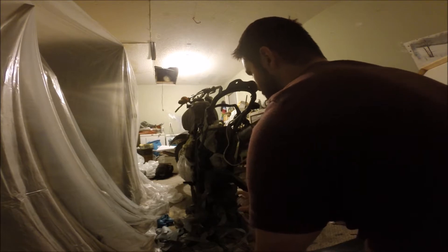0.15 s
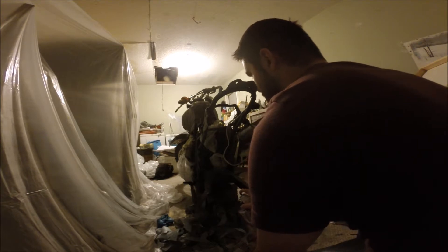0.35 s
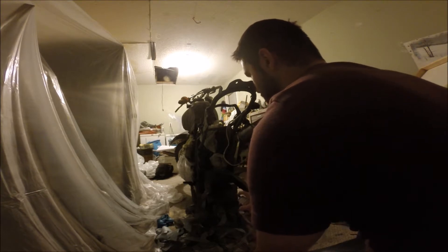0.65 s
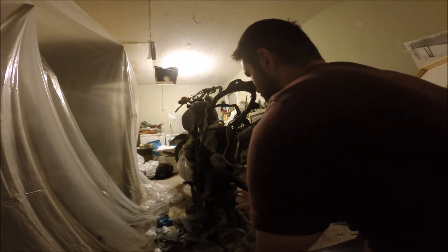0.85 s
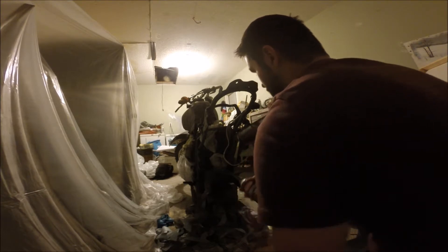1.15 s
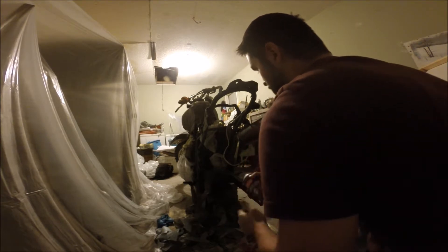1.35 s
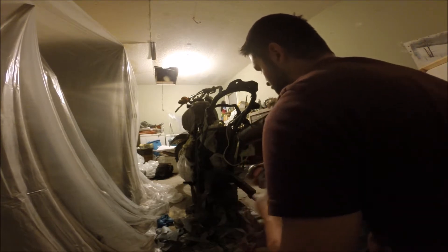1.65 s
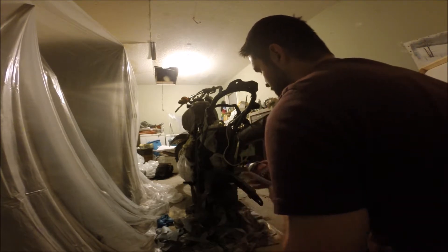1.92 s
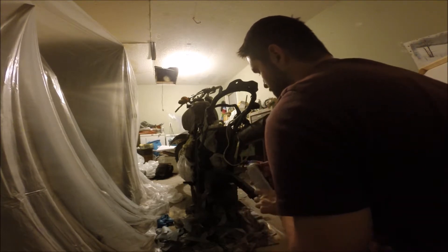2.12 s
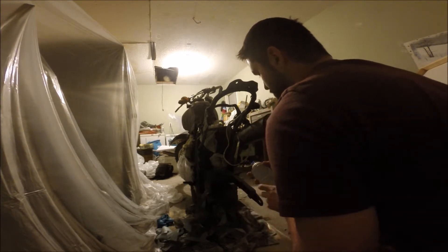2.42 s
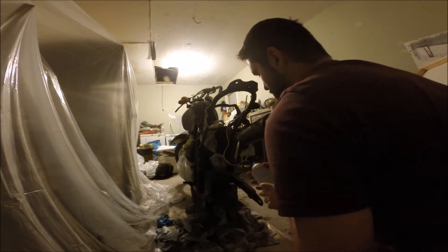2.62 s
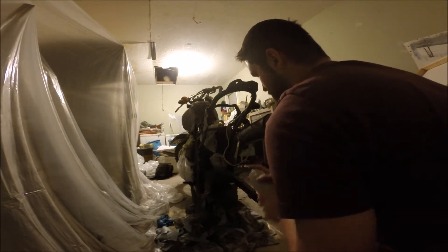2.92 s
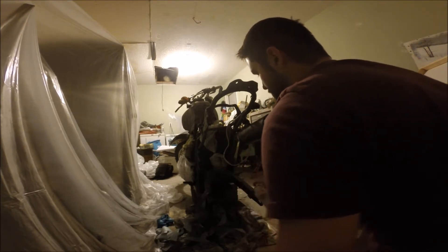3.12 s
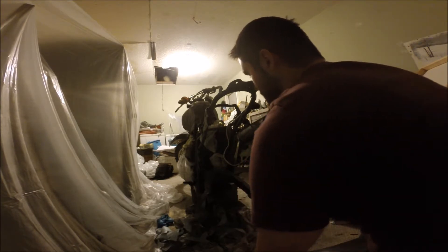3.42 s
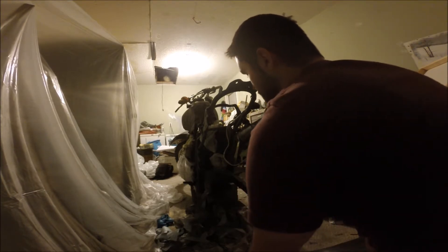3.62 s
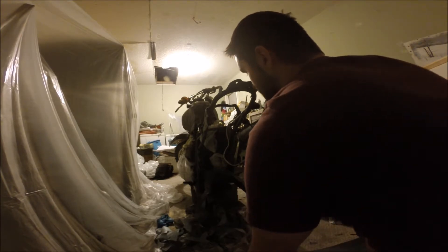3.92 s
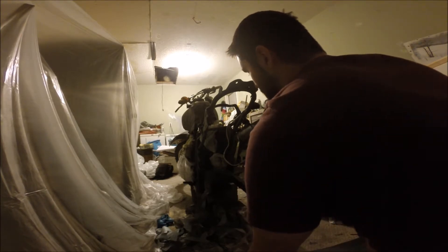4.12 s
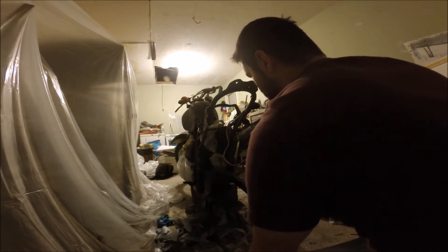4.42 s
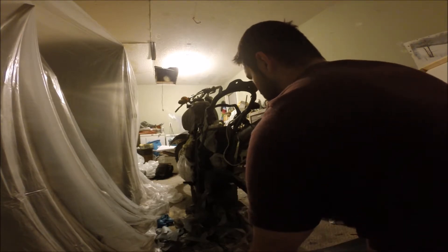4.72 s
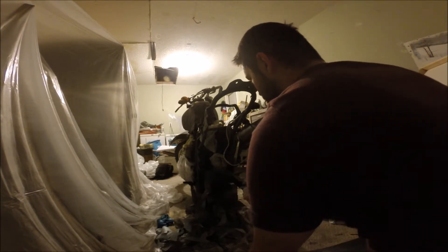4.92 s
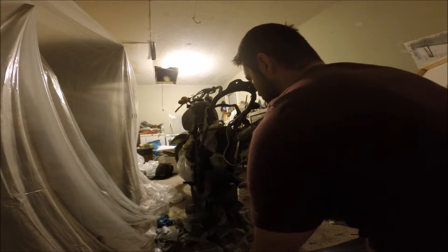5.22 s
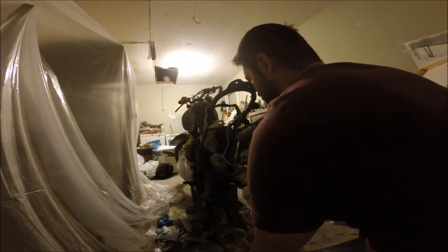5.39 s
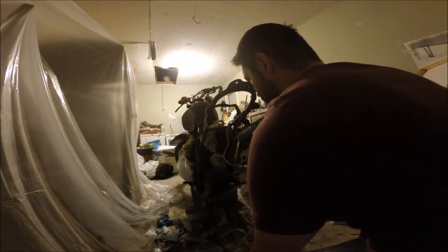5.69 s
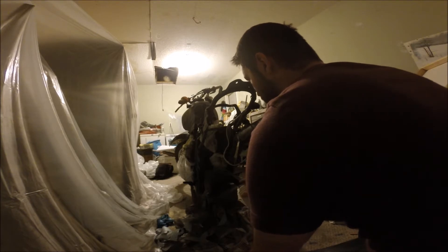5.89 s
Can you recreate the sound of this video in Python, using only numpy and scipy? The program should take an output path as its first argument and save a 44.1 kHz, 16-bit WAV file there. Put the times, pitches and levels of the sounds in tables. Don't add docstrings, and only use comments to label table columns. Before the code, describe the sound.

In a small workshop, an aerosol can is shaken, its steel ball clacking briefly, then rattling densely, before two soft hissing sprays.

```python
import sys
import numpy as np
from scipy import signal
from scipy.fft import rfft, irfft
from scipy.io import wavfile

SR = 44100
rng = np.random.default_rng(int(sys.argv[2]) if len(sys.argv) > 2 else 0)


def nominal_scale(level):
    x = np.asarray(level, float) / 20
    return 10 ** x


def transcribe(u):
    v = np.clip(np.atleast_2d(u).T, -1, 1)
    q = np.round(v * 32767).astype(np.int16)
    wavfile.write(sys.argv[1], SR, q)


N = 266829


def rms_one(x):
    return x / np.sqrt(np.mean(x ** 2) + 1e-20)


def at_hz(points, hz):
    point_hz, level_db = np.array(points)[:, 0], np.array(points)[:, 1]
    return np.interp(np.log(hz), np.log(point_hz), level_db)


def band_pass(x, edges_hz, order=2):
    return signal.sosfilt(signal.butter(order, edges_hz, "band", fs=SR, output="sos"), x)


def gestures(tables, follows=0.89):
    mean_db = -55
    t, gain = np.arange(N) / SR, np.zeros(N)
    for rows in tables:
        s, level_db = np.transpose(rows)
        fade = np.clip(np.minimum(t - s[0], s[-1] + .02 - t) / .02, 0, 1)
        gain += fade * nominal_scale(mean_db + follows * (np.interp(t, s, level_db) - mean_db))
    return gain


def drift(rate):
    r = np.exp(-80 * np.pi * rate / SR)
    slow = signal.lfilter([1], [1, -2 * r, r * r], rng.standard_normal(N // 40 + 2002))[2000:]
    return np.interp(np.arange(N) / 40, np.arange(len(slow)), rms_one(slow))


def ring(clicks, hz, t60):
    r, w = nominal_scale(-60 / (t60 * SR)), 2 * np.pi * hz / SR
    return signal.lfilter([0, np.sin(w)], [1, -2 * r * np.cos(w), r * r], clicks + 1e-18)


def coloured_noise(spectrum):
    hz = np.maximum(np.fft.rfftfreq(N, 1 / SR), 1)
    bins = rfft(rng.standard_normal(N)) * nominal_scale(at_hz(spectrum, hz)) * (hz > 18)
    return rms_one(irfft(bins, N))


# (frequency [Hz], level [dB])
FLOOR_COLOUR = [(12, -30), (20, 1), (122, -3.5), (306, -8.5), (372, -10), (1040, -17.5), (1270, -18),
                (1630, -19.5), (2920, -23), (3260, -24.5), (4070, -25.5), (14300, -43.5), (15500, -39)]


def hiss_and_rumble():
    low_pass = signal.ellip(6, .5, 30, 14900, fs=SR, output="sos")
    return nominal_scale(-54.5) * signal.sosfilt(low_pass, coloured_noise(FLOOR_COLOUR))


# (frequency [Hz], time to fall 60 dB [s])
ROOM_T60 = [(250, 0.35), (1300, 0.23), (3500, 0.19), (9000, 0.21), (15000, 0.19)]
# (frequency [Hz], level [dB])
ROOM_COLOUR = [(250, -5), (1300, 5), (3500, 7.5), (9000, 9), (15000, 12.5)]


def echoes():
    rise_s = 0.00083
    t, out = np.arange(SR // 2) / SR, 0
    edges_hz = 120 * 2 ** np.arange(0, 7.1, .5)
    white = rng.standard_normal((2, len(t)))
    for k, (low_hz, high_hz) in enumerate(zip(edges_hz, edges_hz[1:])):
        band = band_pass(white[k % 2], [low_hz, high_hz])
        hz = np.sqrt(low_hz * high_hz)
        out = out + band * nominal_scale(at_hz(ROOM_COLOUR, hz) - 60 * t / at_hz(ROOM_T60, hz))
    return out * (1 - np.exp(-t / rise_s))


def workshop(x):
    room_db, spots_per_s = 9, 27
    swing = np.arange(N) / SR * spots_per_s % 4
    out = np.zeros(N)
    for spot in range(4):
        nearness = np.clip(1 - np.abs((swing - spot + 2) % 4 - 2), 0, 1)
        out += signal.fftconvolve(x * np.sqrt(nearness), echoes())[:N]
    return nominal_scale(room_db - 43) * out


# (time [s], level [dB])
SPRAY_FLOW = [
    [(4.866, -67), (4.922, -48), (5.068, -55), (5.078, -50.5), (5.126, -70)],
    [(5.544, -66), (5.57, -58), (5.608, -51), (5.63, -58), (5.968, -58.5), (6.02, -47), (6.05, -50)],
]
# (frequency [Hz], level [dB per Hz])
JET_COLOUR = [(410, -33), (700, -15), (1050, -13), (1210, -8.5), (1600, -8.5), (2800, -6), (3070, -13),
              (3270, -9), (3870, 0.5), (6180, -3.5), (15500, -14)]
# (frequency [Hz], width [Hz], level [dB])
WHISTLES = [(1204, 61, -19.5), (3090, 59, -18), (4520, 90, -13), (5200, 680, -17)]
# (low edge [Hz], high edge [Hz])
JET_BANDS = [(500, 1700), (1700, 3500), (3500, 5500), (5500, 8000), (8000, 11000), (11000, 16500)]


def spray():
    jet = coloured_noise(JET_COLOUR)
    for hz, width_hz, level_db in WHISTLES:
        t60 = np.log(1000) / (np.pi * width_hz)
        whistle = ring(ring(rng.standard_normal(N), hz, t60), hz, t60)
        jet = jet + nominal_scale(level_db) * rms_one(whistle)
    low = nominal_scale(3) * gestures(SPRAY_FLOW, 0.7)
    core = gestures(SPRAY_FLOW)
    top = nominal_scale(-2.5) * gestures(SPRAY_FLOW, 0.73)
    out = np.zeros(N)
    for edges_hz, flow in zip(JET_BANDS, [low, low, core, core, top, top]):
        flutter_db = 2.1 * drift(7.4) + 0.27 * drift(150)
        out += flow * nominal_scale(flutter_db) * band_pass(jet, edges_hz, order=3)
    return nominal_scale(5) * out


# (time [s], peak level [dB])
KNOCK = [
    (3.347, -19),
]
# (frequency [Hz], level [dB], time to fall 60 dB [s])
KNOCK_MODES = [(276.3, -1, 0.13), (329, 3.5, 0.056), (468, -13, 0.06), (560, 0, 0.048), (605, -7, 0.052)]


def knock():
    push = np.zeros(N)
    time_s, peak_db = KNOCK[0]
    at = round(time_s * SR)
    push[at:at + 60] = nominal_scale(peak_db - 34) * np.hanning(60)
    body = sum(nominal_scale(level_db) * ring(push, hz, t60) for hz, level_db, t60 in KNOCK_MODES)
    return signal.sosfilt(signal.butter(4, 190.0, "high", fs=SR, output="sos"), body)


# (time [s], wall peak level [dB], brightness as dome level over wall [dB], strongest wall pitch [Hz])
FIRST_SHAKE = [(0.985, -51, -3, 2300), (1.374, -28.5, -1, 2600), (1.389, -31.5, -11, 2460),
               (1.411, -37.5, -11, 2130), (1.499, -42, 3, 2480), (1.529, -29, 0, 2180),
               (1.555, -27, -17, 1810), (1.581, -32.5, 2.5, 2300), (1.666, -23.5, -22, 1560),
               (1.73, -52, 3, 1760), (1.739, -41.5, 8, 1740), (1.789, -43, 3, 1770),
               (1.845, -48.5, -11, 1590), (1.883, -45.5, -14, 2240), (1.979, -52.5, -7, 2400),
               (2.444, -54.5, -5, 1730)]
RATTLE = [(3.006, -52, -11, 923), (3.2029, -33.5, -9, 1280), (3.22, -28.5, 0.5, 2590),
          (3.269, -27.5, 3, 2930), (3.368, -20, -19, 1680), (3.378, -25, -14, 1730),
          (3.424, -27.5, 2.5, 1590), (3.449, -36, -14, 2250), (3.521, -23, -4.5, 1940),
          (3.5576, -35.5, 12, 1490), (3.651, -19.5, -12, 1570), (3.694, -24.5, -2.5, 2680),
          (3.734, -23.5, -13, 1520), (3.774, -17, -32, 1370), (3.796, -26.5, -27, 1890),
          (3.855, -22, -2, 1120), (3.884, -26, -14, 1370), (3.903, -26, -16, 1360), (3.931, -29, -32, 1800),
          (3.967, -24, -2, 1670), (3.988, -26.5, -9, 1500), (4.049, -27.5, 2, 2680), (4.118, -23, 5, 1750),
          (4.268, -27, 12, 2400), (4.289, -24, -20, 1620), (4.4273, -21.5, 1.5, 1230)]
SETTLING = [(4.565, -39.5, -25, 1710), (4.655, -34.5, -2.5, 2140), (4.74, -39, 2.5, 2300),
            (4.769, -37, -12, 2050), (4.798, -39.5, -9, 1640), (5.076, -60, -2, 1420),
            (5.136, -28.5, -10, 2300), (5.257, -30.5, -1, 2630), (5.3, -40, -38, 1500),
            (5.331, -42, 2.5, 1660), (5.397, -49, 7.5, 2580), (5.448, -45, -6, 1360)]


def first_contact():
    s, peak_db, bright_db, _ = np.transpose(FIRST_SHAKE + RATTLE + SETTLING)
    at = np.round(s * SR).astype(int)
    snap, thud = np.zeros((2, N))
    snap[at] = nominal_scale(15 + peak_db + 1.13 * bright_db)
    thud[at] = nominal_scale(1 + peak_db - 0.33 * bright_db)
    return band_pass(snap + 1e-18, (2300, 6500)), band_pass(thud + 1e-18, (700, 1220))


# (frequency [Hz], level [dB], time to fall 60 dB [s])
WALL_MODES = [(1030, -2.5, 0.056), (1240, 7, 0.0079), (1457, -3.5, 0.065), (1570, 6, 0.018),
              (1775, 7.5, 0.016), (1761, 4, 0.031), (2000, 0.5, 0.012), (2142, -3, 0.045),
              (2506, 9.5, 0.0063), (2773, -0.5, 0.036)]
# (frequency [Hz], level [dB], time to fall 60 dB [s])
DOME_MODES = [(3535, 6, 0.009), (4000, -12.5, .1), (3980, 4, 0.0066), (4158, 4, 0.023)]
# (frequency [Hz], level [dB], time to fall 60 dB [s])
TOP_MODES = [(5410, 6.5, 0.0028), (6230, 5, 0.0079), (6650, 5.5, 0.0037), (9010, 6, 0.0043),
             (9750, -10.5, 0.0064)]
# (low edge [Hz], high edge [Hz], level [dB])
CRACKS = [(648, 3320, 27.5), (3270, 4440, 35), (4770, 9500, 24)]
GRIP_DB = [0.5, 0.57, -1]
# (time [s], level [dB])
ROLLING = [
    [(0.96, -54), (1.0, -51), (1.15, -68.5)],
    [(1.36, -52), (1.56, -56), (1.746, -45), (1.916, -60), (2.1, -72)],
    [(3.1, -57), (3.376, -44.5), (3.632, -46), (3.986, -32), (4.268, -45), (4.5, -44.5), (4.6, -43.5),
     (4.87, -45.5)],
    [(5.12, -56), (5.5, -52)],
]


def ball():
    s, peak_db, bright_db, wall_hz = np.transpose(FIRST_SHAKE + RATTLE + SETTLING)
    grip_db = np.repeat(GRIP_DB, [len(FIRST_SHAKE), len(RATTLE), len(SETTLING)])
    at, after = np.round(s * SR).astype(int), np.arange(2400)
    skid_s, buckle_s, focus_db = 0.0036, 0.0023, -16.5

    skid_db = -17 - 0.3 * (peak_db + 28.5) - 0.38 * (bright_db + 3)
    contact = rng.standard_normal((len(at), len(after))) * np.exp(-after / (skid_s * SR))
    contact *= nominal_scale(skid_db[:, None] - 8.5)
    contact += rng.standard_normal(contact.shape) * np.exp(-after / (buckle_s * SR)) * nominal_scale(-17)
    contact[:, 0] = 0.64

    patter = rng.standard_normal(N) * (rng.random(N) < .03) * 6.42
    rolling = nominal_scale(-11.5 - 30.5 + 4.0 * drift(32)) * gestures(ROLLING) * patter

    def force(strength_db):
        pushes = contact * nominal_scale(peak_db + strength_db - 11)[:, None]
        return np.bincount((at[:, None] + after).ravel(), pushes.ravel(), N + len(after))[:N]

    families = [WALL_MODES, DOME_MODES, TOP_MODES]
    shares_db = [0 * s, bright_db, -3 + 0.52 * bright_db]
    out = np.zeros(N)
    for family, (modes, (low_hz, high_hz, crack_db)) in enumerate(zip(families, CRACKS)):
        share_db = shares_db[family]
        drive = force(share_db) + rolling * nominal_scale(7 - 27.0 * family)
        out += nominal_scale(crack_db) * band_pass(drive, [low_hz, high_hz])
        luck_db = grip_db[:, None] + 2 * rng.standard_normal((len(at), len(modes)))
        for k, (hz, level_db, t60) in enumerate(modes):
            landing_db = focus_db * np.abs(np.log2(hz / wall_hz)) * (family == 0)
            push = force(share_db + landing_db + luck_db[:, k]) + rolling * nominal_scale(-12.0 * family)
            out += (-1) ** k * nominal_scale(level_db) * ring(push, hz, t60)
    return out + nominal_scale(3) * band_pass(drive, [7800, 14000])


def scene():
    snap, thud = first_contact()
    can = ball() + knock() + thud
    return (can + snap + workshop(can) + spray() + hiss_and_rumble())[None]


# (time [s], lowest frequency touched [Hz], share of bands kept [0-1])
THIN_MOMENTS = [(.078, 5500, .2), (.377, 3500, .2), (1.79, 11000, .4), (2.085, 7000, .15),
                (2.745, 6000, .15), (3.145, 7000, .4), (3.682, 2800, .45), (3.751, 2800, .2),
                (4.517, 4500, .6), (4.685, 7200, .02), (5.497, 4500, .2), (5.838, 400, .4),
                (6.028, 500, .45)]


def thin_out(x):
    size = 2048
    out, hz = np.pad(x, (0, size)), np.fft.rfftfreq(size, 1 / SR)
    fade = np.clip(3 * signal.windows.triang(size) - 1.6, 0, 1)
    band_number = (hz ** .8 / 26).astype(int)
    for s, low_hz, kept in THIN_MOMENTS:
        middle = round(s * SR)
        moment = slice(middle - size // 2, middle + size // 2)
        lost = (rng.random(128) > kept)[band_number] & (hz > low_hz)
        out[moment] -= .96 * fade * irfft(rfft(out[moment]) * lost)
    return out[:N]


def top_cut(x):
    return signal.sosfilt(signal.butter(12, 16500, fs=SR, output="sos"), x)


def record(dry):
    low_pass = signal.ellip(6, .5, 32, 15250, fs=SR, output="sos")
    mix = thin_out(signal.sosfilt(low_pass, dry)[0])[None]
    return top_cut(mix)


dry = scene()
out = record(dry)
transcribe(out)
```